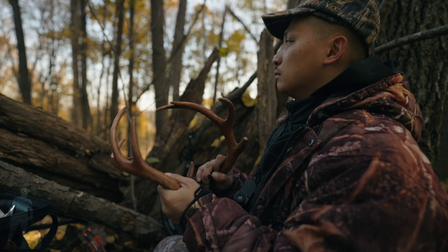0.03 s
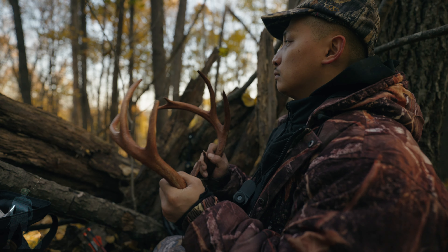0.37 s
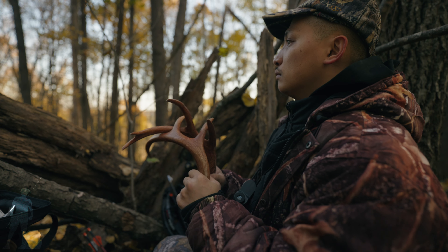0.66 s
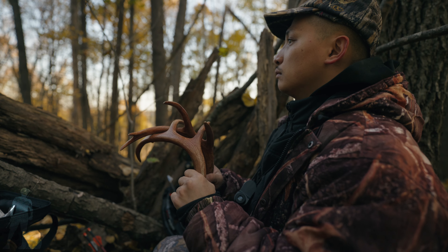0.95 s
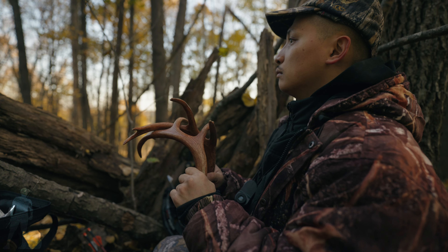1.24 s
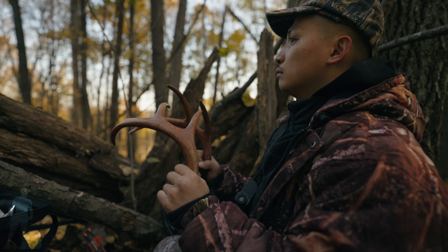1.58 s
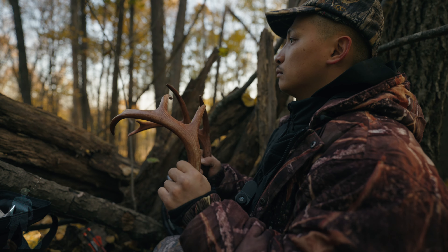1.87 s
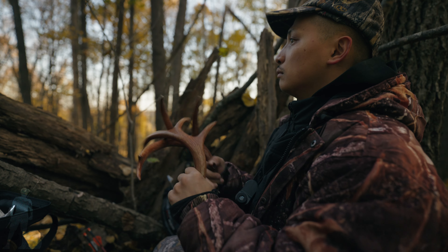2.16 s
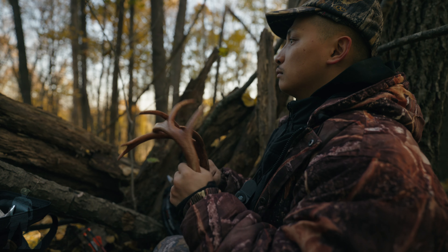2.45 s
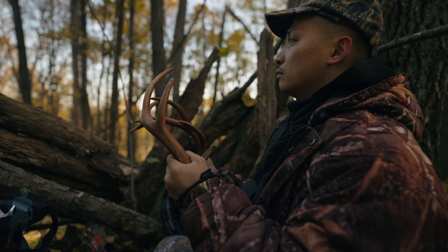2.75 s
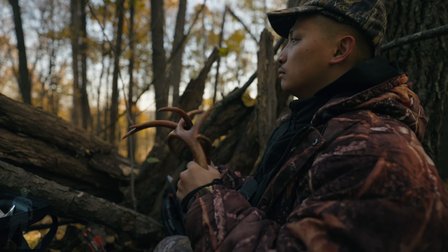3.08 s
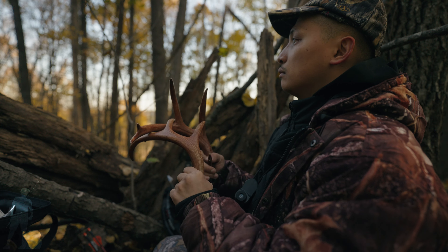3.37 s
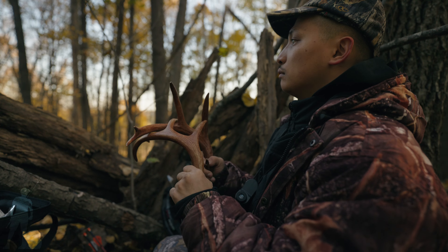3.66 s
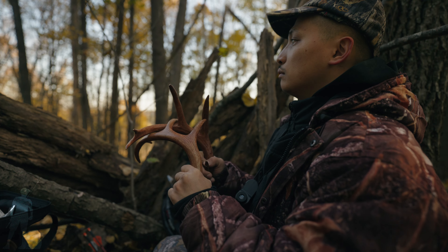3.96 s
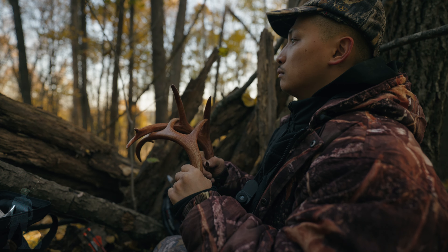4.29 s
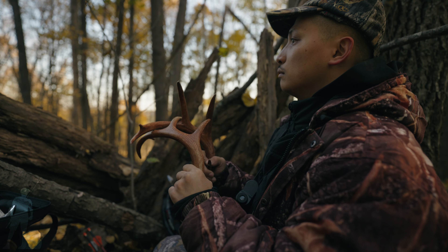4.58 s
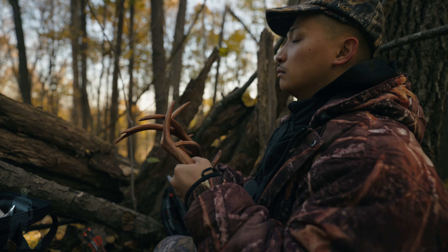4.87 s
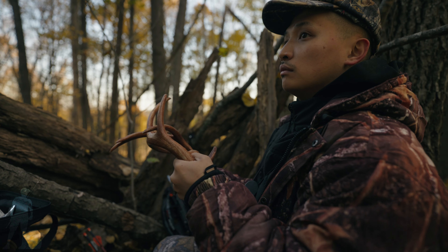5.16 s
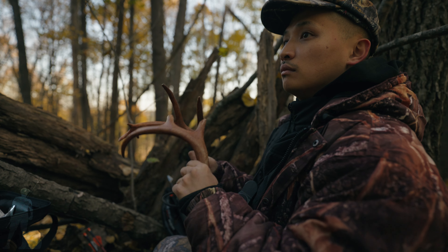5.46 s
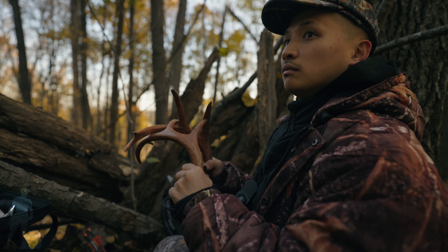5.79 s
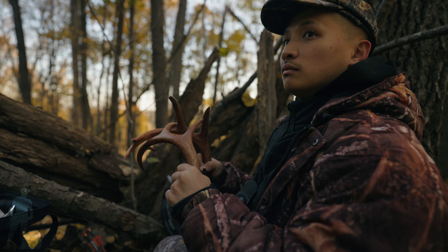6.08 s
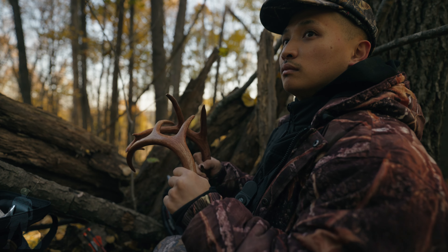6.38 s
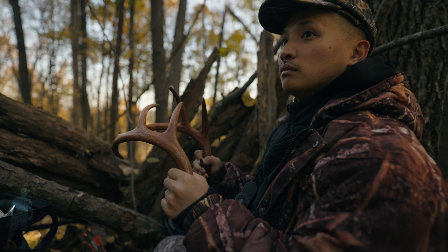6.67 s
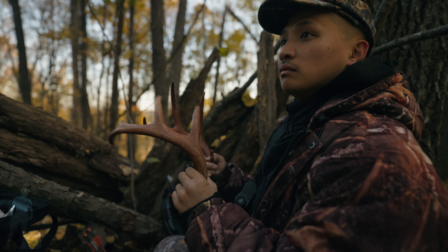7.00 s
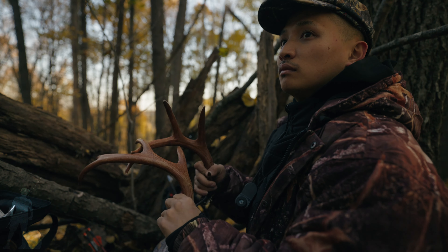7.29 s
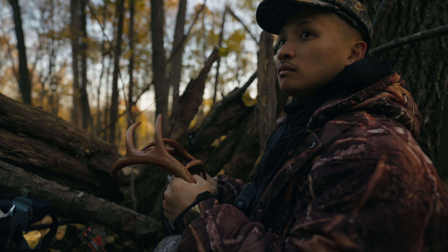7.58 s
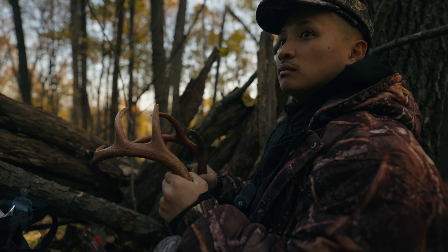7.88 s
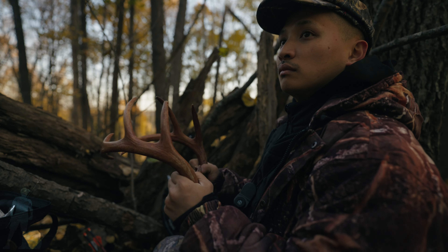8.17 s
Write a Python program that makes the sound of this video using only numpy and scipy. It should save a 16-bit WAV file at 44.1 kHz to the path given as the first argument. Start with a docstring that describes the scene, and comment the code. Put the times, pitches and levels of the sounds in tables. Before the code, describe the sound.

In quiet woods, antlers are rattled in uneven bursts of sharp clacks and scrapes, with soft sleeve swishes and low hum.

```python
"""Still woods: a hunter rattles two deer antlers in short, irregular bouts.
The tines clack, chatter and scrape, ringing the racks; in the roughest clashes the thick beams bump.
Jacket sleeves swish, a short, bright wash of hiss trails the hardest clash, and the trees echo faintly.
Underneath lies a bed of low hum, thin whine and soft air. A limiter ducks the hardest hits."""
import sys
import numpy as np
from scipy import signal
from scipy.fft import rfft, irfft, next_fast_len
from scipy.io import wavfile
from scipy.ndimage import uniform_filter1d, minimum_filter1d, map_coordinates

SR = 44100
rng = np.random.default_rng(int(sys.argv[2]) if len(sys.argv) > 2 else 0)


def digitize_waveform(pressure):
    """Quantize a signal to 16-bit integers and store it at the path in sys.argv[1].

    Rows of a 2-D input are taken as channels; values are limited to [-1, 1].
    """
    field = np.atleast_2d(pressure).T
    bounded = np.clip(field, -1, 1)
    quanta = np.round(bounded * 32767).astype(np.int16)
    wavfile.write(sys.argv[1], SR, quanta)


N = 372204

# noise colours of the bed and the swishes: (frequency [Hz], relative level [dB])
AIR_SPECTRUM = [(88, -28), (150, -2.5), (244, -3), (480, -10.5), (540, -22), (675, -12.5), (775, -24.5),
                (1020, -11), (1400, -17), (2400, -19.5), (6000, -22.5), (12000, -27.5), (15000, -30.5),
                (16000, -42)]
RUMBLE_SPECTRUM = [(20, -24), (45, -11.5), (75, -1), (100, 4), (122, 1), (150, -16.5), (250, -26),
                   (500, -74)]
SWISH_SPECTRUM = [(200, -7), (600, 9), (2500, 3), (5000, -1), (9000, -5.5), (12000, -13.5), (16000, -20.5)]
# tones of the whine: (frequency [Hz], level [dB])
WHINE_TONES = [(246, -68), (1875, -77), (1975, -66), (14070, -75)]
# swishes: (peak time [s], relative level [dB], rise [s], fall [s])
# the one at 2.305 s is a short, bright wash of hiss trailing the hardest clash; the rest are sleeves
SWISHES = [(0.03, -47, 0.46, 0.21), (0.27, -60, .15, 1), (2.14, -49.5, 0.26, 0.044),
           (2.305, -35.5, 0.036, 0.13), (3.1, -51.5, 0.16, .05), (4.69, -67, .2, .05),
           (7.05, -46.5, 0.44, 0.13), (7.22, -43, .03, .35), (8.27, -47.5, .2, .05)]
# colour of the echo off the trees: (frequency [Hz], relative level [dB])
ECHO_SPECTRUM = [(100, 0), (700, 4.5), (2500, -1), (7000, -1.5), (15000, -2.5)]
# decay of that echo: (frequency [Hz], t60 [s])
ECHO_DECAY = [(200, .4), (1500, 0.21), (5000, 0.42), (9000, .5), (14000, 0.27)]
# bending modes of the two racks: (frequency [Hz], relative level [dB], base t60 [s])
RACK_MODES = [(318, -14, 0.055), (434, -10.5, 0.062), (602, -10.5, .09), (674, -16, 0.11), (884.5, -6, .07),
              (1086, -6.5, 0.052), (1450, -7.5, 0.1), (1618, 1.5, 0.059), (1716, -6, .07), (1977, -4, .06),
              (2120, -10, 0.088), (2242, -2.5, 0.058), (2532, -1, 0.059), (2720, -8, .045),
              (2790, -1, 0.041), (3265, -2, 0.031), (3667, -2.5, 0.025), (3823, -3.5, 0.039),
              (4045, -5, .04), (4430, -8, .035), (4610, -6.5, .04), (5056, -7.5, 0.053), (5480, -9, 0.032),
              (6190, -7, 0.023), (6750, -9, 0.054), (8390, -9.5, 0.022), (9720, -12, 0.017)]
# noise colours of a beam bump, a scrape and a tine's crack: (frequency [Hz], relative level [dB])
BUMP_SPECTRUM = [(60, -25.5), (110, -11.5), (250, -0.5), (340, 1.5), (420, 1.5), (550, -14), (1200, -33.5),
                 (4000, -72)]
RASP_SPECTRUM = [(120, -29.5), (250, -16.5), (520, -15), (630, -0.5), (775, -11.5), (1050, 0), (1350, -7),
                 (1700, -3), (2500, -12.5), (3800, -14.5), (6000, -16), (9500, -22), (12000, -34.5),
                 (15000, -47)]
CRACK_SPECTRUM = [(60, -37), (160, -9.5), (330, -1.5), (770, -10), (1000, 2), (2500, 10.5), (4000, 3.5),
                  (7000, -1.5), (10000, -10), (12500, -15), (16000, -26.5)]
# decay of the crack at the usual grip: (frequency [Hz], t60 [s])
CRACK_DECAY = [(200, 0.047), (1500, 0.039), (4000, 0.045), (8000, 0.023), (15000, 0.027)]
# beam against beam: (time [s], level [dB])
BEAM_BUMPS = [(0.5268, -29), (0.5658, -24.5), (4.7124, -24), (4.7812, -21), (4.8149, -28), (4.846, -29),
              (5.57, -29.5)]
# tine sliding on tine: (start [s], length [s], relative rasp [dB], relative grit [dB], squeak [Hz])
SCRAPE_STROKES = [(0.725, 0.052, -41, -56, 2750), (1.345, 0.122, -34, -52.5, 2500),
                  (2.435, 0.07, -31, -49, 2280), (2.61, 0.07, -45, -61, 2330),
                  (2.675, 0.075, -38, -43, 3600), (3.13, 0.066, -26.5, -47, 2590),
                  (3.22, 0.08, -44.5, -54, 2700), (3.33, 0.055, -35, -48.5, 2494),
                  (4.62, 0.085, -49.5, -61, 2268), (4.91, 0.085, -44, -63, 2430),
                  (5.02, 0.075, -43.5, -57.5, 2145), (5.305, 0.128, -32.5, -47, 2132),
                  (6.1, 0.31, -43, -63, 2448), (7.38, 0.065, -37.5, -46, 2707),
                  (7.51, 0.15, -31, -45, 2620)]
# tine striking tine: (time [s], clack level [dB], beam knock [dB re clack], tip snap [dB re clack],
# tine pitch [Hz], ring length [1 = usual grip])
TINE_HITS = [(0.5155, -5.5, -15, -0.5, 1650, 0.49), (0.5233, -5, -11, -6, 1640, .9),
             (0.5275, -10, -13, -15, 1630, 1.5), (0.5607, -16.5, -31, -6, 2230, 3),
             (0.5669, -12, -26, -8, 3230, 0.94), (0.582, -8, -18, -11.5, 3230, 1.75),
             (0.611, -20.5, -9, -17.5, 2560, 2.2), (0.6247, -5, -14, -8, 2300, 0.26),
             (0.629, -6.5, -8.5, -22, 1620, 1.33), (0.6488, -14, -13, -15.5, 3220, 1.25),
             (0.6774, -29.5, -9, -19, 2860, 0.91), (1.4105, -31, -10, -24, 2570, 2.65),
             (1.471, -31, -21, -9.5, 2660, 0.88), (2.1571, -21, -7.5, 5.5, 5210, 1.03),
             (2.1965, 6, -24, -14.5, 2400, 1.6), (2.206, -4, -16.5, -13.5, 2720, 1.2),
             (2.218, 8, -18.5, -9, 2600, 0.98), (2.229, 0.5, -8.5, -15, 1630, 1.02),
             (2.2458, -7.5, -11.5, -17, 1660, 1.12), (2.4188, -24, -10, -29, 1960, 1.6),
             (2.4243, -22.5, -10.5, -30, 1640, 1.9), (2.4527, -26.5, -14, -31, 1680, 2.2),
             (2.5134, -15, -13.5, -10.5, 2250, .6), (2.5212, -21, -14.5, -5.5, 2800, 2.2),
             (2.562, -12.5, -22, -10.5, 1800, 0.95), (2.5828, -14.5, -19.5, -15.5, 1740, 1.35),
             (2.6, -25.5, -9, -15.5, 1630, .65), (2.613, -30.5, -9, -13, 1480, 1.4),
             (2.7777, -38, -16, -10.5, 3930, 1.9), (3.105, -.5, -9, -5, 3270, 1.7),
             (3.1089, 0.5, -10, -6.5, 2320, .4), (3.1145, -2, -10.5, -11.5, 2230, 1.4),
             (3.1251, 1, -6, -16, 1740, 0.59), (3.1347, -8.5, -12, -12, 2630, 1),
             (3.1471, -16, -19, -14, 2540, 1.4), (3.3622, -33.5, -21, -14, 2560, 1.53),
             (4.7125, -12, -15.5, -24, 2860, 0.97), (4.7514, 1.5, -12, -6, 1530, 0.69),
             (4.7582, -4, -13.5, 2.5, 3700, 0.93), (4.7724, -7, -6, -0.5, 5400, 1.1),
             (4.7818, -10, -36, 5, 3590, 0.56), (4.795, -22, -9, 6.5, 5600, 1),
             (4.7992, -6, -9, -2, 2880, 1.3), (4.8131, -12, -11, -18, 2570, 1.6),
             (4.8324, -15, -7.5, 10, 4390, 0.68), (4.8455, -16.5, -19, -23.5, 1460, 1.1),
             (4.8564, -21.5, -3, 2.5, 2520, 0.82), (4.8731, -29, -7.5, -0.5, 5400, 1.56),
             (5.0952, -40.5, -5.5, -21, 2000, 0.6), (5.1577, -26, -19.5, -9.5, 2640, 0.84),
             (5.1795, -35, -6.5, -23, 1450, 0.8), (5.24, -13.5, -13, -22.5, 1637, 1.1),
             (5.277, -27, -4, -22, 1670, 2), (5.4556, -13, -20, 2.5, 3700, 0.82),
             (5.4784, -20.5, -16, -3, 2460, 1.4), (5.4956, -17.5, -18, -0.5, 1790, 1.4),
             (5.5156, -14, -18, -4, 2020, 1.3), (5.5328, -12.5, -17, -21, 2490, 0.53),
             (5.5402, -17, -33, -20, 2440, 0.68), (5.5466, -13.5, -16, -12.5, 2540, 1.07),
             (5.57, -17, -15, -15, 2240, 0.94), (5.578, -19.5, -10, -16.5, 1750, 0.71),
             (6.4592, -43, -15, -5.5, 3560, 1.2), (7.0713, -17, -10, -2.5, 3420, 0.77),
             (7.0795, -2, -12.5, -7.5, 3270, 1.18), (7.093, -13, -19.5, 1.5, 1980, 1.8),
             (7.1278, -3, -8.5, -8.5, 3670, 0.83), (7.1405, -4.5, -28, -6, 3670, 0.78),
             (7.1792, -28.5, -8.5, -25, 2560, 0.64), (7.4497, -12, -14, -3.5, 4600, 1.06),
             (7.461, -23.5, -13, -8, 2540, 1.7), (7.495, -27.5, -12, -15, 2350, 0.71),
             (7.5114, -14.5, -20.5, -21, 2620, 1.4), (7.589, -23.5, -24, -18, 2430, 1.3),
             (7.6097, -31.5, -5, -10, 2800, 0.64), (7.634, -23.5, -6.5, -16, 2840, 1.9),
             (7.656, -24, -6, -5, 2660, 1.02), (7.6972, -26, -7, -2, 2800, 0.92),
             (7.715, -34, -8.5, -9, 3590, 2.2), (8.2908, -20.5, -10, 4, 3790, 1.06),
             (8.3095, -12.5, -8, -13, 1680, .57), (8.3195, -6, -18, -10.5, 2310, 1.1),
             (8.332, -7.5, -17.5, -11.5, 3960, 1.12), (8.4267, -12, -20, -11, 3830, 1.24)]
# thud, knock, clack and snap ranges of a hit: (low edge [Hz], high edge [Hz])
HIT_BANDS = [(150, 500), (500, 1200), (1200, 4500), (4500, 16000)]
BAND_FILTERS = [signal.butter(3, edges, "band", fs=SR, output="sos") for edges in HIT_BANDS]


def amp(db):
    """Decibels to gain."""
    return 10 ** (np.asarray(db) / 20)


def unit(x):
    """x scaled to rms 1."""
    return x / np.sqrt(np.mean(x ** 2) + 1e-20)


def along(points, hz):
    """A curve through (Hz, value) points, read on a log frequency axis."""
    freqs, values = np.transpose(points)
    return np.interp(np.log(hz + 1), np.log(freqs + 1), values)


def wobble(rate):
    """A smooth random curve, rate knots a second."""
    knots = rng.standard_normal(int(N * rate / SR) + 4)
    return map_coordinates(knots, [np.arange(N) * rate / SR])


def filtered(x, response):
    """Zero-phase EQ; response gives the gain at each frequency."""
    size = next_fast_len(len(x) + 8192)
    return irfft(rfft(x, size) * response(np.fft.rfftfreq(size, 1 / SR)), size)[:len(x)]


def causal_eq(x, points):
    """Minimum-phase EQ through (Hz, dB) points, which keeps attacks sharp."""
    cepstrum = irfft(np.log(amp(along(points, np.fft.rfftfreq(len(x), 1 / SR)))))
    cepstrum[1:len(x) // 2] *= 2
    cepstrum[len(x) // 2 + 1:] = 0
    return irfft(rfft(x) * np.exp(rfft(cepstrum)))


def noise(spectrum):
    """Steady coloured noise of rms 1."""
    return unit(filtered(rng.standard_normal(N), lambda hz: amp(along(spectrum, hz))))


def noise_burst(spectrum, decay, size):
    """Coloured noise in which each frequency dies at its own speed."""
    hz, t, frames = signal.stft(rng.standard_normal(size), SR, nperseg=128)
    gain = unit(amp(along(spectrum, hz)))[:, None] * amp(-60 * t / along(decay, hz)[:, None])
    return signal.istft(frames * gain, SR, nperseg=128)[1][:size]


def background(hum_hz=61.3):
    """The bed: a wavering low hum with rumble, a thin whine and the soft hiss of the air."""
    tone = lambda hz: np.sqrt(2) * np.sin(2 * np.pi * np.cumsum(hz) / SR)
    hum = amp(-40 + .5 * wobble(9.9)) * tone(hum_hz + .84 * wobble(16))
    whine = sum(amp(db + 1.5 * wobble(11)) * tone(hz + 3 * wobble(25)) for hz, db in WHINE_TONES)
    return hum + whine + amp(-54) * noise(RUMBLE_SPECTRUM) + amp(-60) * noise(AIR_SPECTRUM)


def swishes(swell_db=20):
    """Sleeves, and the hiss after the hardest clash: noise moves by swell_db over each rise and fall."""
    t = np.arange(N) / SR
    envelope = sum(amp(db - swell_db * np.maximum((peak - t) / rise, (t - peak) / fall))
                   for peak, db, rise, fall in SWISHES)
    return amp(-7) * envelope * noise(SWISH_SPECTRUM) * amp(.5 * wobble(40))


def tree_echo(x, bloom_s=.01):
    """Trunks and leaves scatter the sound into a tail that blooms a little late."""
    tail = noise_burst(ECHO_SPECTRUM, ECHO_DECAY, size=32768)
    tail *= 1 - np.exp(-np.arange(len(tail)) / SR / bloom_s)
    return signal.fftconvolve(x, tail / np.linalg.norm(tail))[:N]


def beam_bumps(size=4096, t60_s=.054):
    """A soft, heavy contact of the beams gives a short, dull thud."""
    out, t = np.zeros(N + size), np.arange(size) / SR
    for start, db in BEAM_BUMPS:
        thud = causal_eq(rng.standard_normal(size) * amp(-60 * t / t60_s), BUMP_SPECTRUM)
        attack_rms = np.sqrt(np.mean(thud[t < .006] ** 2))
        out[round(start * SR):][:size] += amp(db) * thud / attack_rms
    return out[:N]


def rack_ring(size, tine_hz, ring_length, tine_db, scatter_db, detune):
    """The racks ring: modes near the tine's pitch are boosted, and the grip damps and shifts them all."""
    hz, db, t60 = np.transpose(RACK_MODES)[:, :, None]
    t60 = np.minimum(t60, 230 / hz)  # bone is lossy: a few hundred cycles at most
    t60 = t60 * max(ring_length, .2)
    strength, shift, polarity = rng.standard_normal((3, len(RACK_MODES), 1))
    near_tine = np.exp(-(np.log2(hz / tine_hz) / .092) ** 2)
    gain = np.sign(polarity) * amp(db + tine_db * near_tine + scatter_db * strength)
    t = np.arange(size) / SR
    modes = amp(-60 * t / t60) * np.sin(2 * np.pi * hz * (1 + detune * shift) * t)
    return gain[:, 0] @ modes


def scrape_envelopes(press_db=15.5, press_share=.63, lift_db_per_s=597, pitch_rise=.16):
    """Rasp gain, grit gain and squeak pitch: a stroke presses in, holds, then dies as the tines part."""
    t = np.arange(N) / SR
    rasp, grit = np.zeros((2, N))
    pitch = np.full(N, float(SCRAPE_STROKES[0][-1]))
    for start, length, rasp_db, grit_db, hz in SCRAPE_STROKES:
        on = (t >= start) & (t < start + length + .1)
        age = t[on] - start
        swell_db = -press_db * np.maximum(1 - age / (press_share * length), 0)
        lift_db = -lift_db_per_s * np.maximum(age - length, 0)
        rasp[on] += amp(rasp_db + swell_db + lift_db)
        grit[on] += amp(grit_db + swell_db + lift_db)
        pitch[on] = hz * (1 + pitch_rise * (np.minimum(age / length, 1) - .5))
    return rasp, grit, pitch


def tine_scrapes(slips_per_s=1100, ring_db=1.5, squeak_db=-3, crossover_hz=4500):
    """Sliding tines catch on their ridges: a dense stream of slips rasps, rings the racks and squeaks."""
    slips = (rng.random(N) < slips_per_s / SR) * rng.standard_normal(N)
    grip = amp(3.4 * wobble(110))
    friction = unit((unit(slips) + .5 * rng.standard_normal(N)) * grip)
    rasp = unit(filtered(friction, lambda hz: amp(along(RASP_SPECTRUM, hz))))
    rack = rack_ring(size=4096, tine_hz=2493, ring_length=1, tine_db=5.5, scatter_db=-5, detune=.002)
    ring = unit(signal.fftconvolve(friction, rack)[:N])
    rasp_gain, grit_gain, pitch_hz = scrape_envelopes()
    phase = 2 * np.pi * np.cumsum(pitch_hz * np.exp(.09 * wobble(60))) / SR
    squeak = unit(grip * (wobble(250) * np.sin(phase) + wobble(250) * np.cos(phase)))
    rub = rasp + amp(ring_db) * ring + amp(squeak_db) * squeak
    body = filtered(rub, lambda hz: 1 / (1 + (hz / crossover_hz) ** 8))
    grit = rub - body
    return amp(-2.5) * (rasp_gain * unit(body) + grit_gain * unit(grit))


def chatter(size, bounces=6, mean_delay_s=.006, bounce_db=-15):
    """One blow, then tiny bounces as the knobbly tines skid on."""
    force = np.zeros(size)
    delays = np.minimum(rng.exponential(mean_delay_s, bounces), size / SR / 2)
    fade = np.exp(-delays / mean_delay_s / 2)
    force[(delays * SR).astype(int)] = amp(bounce_db) * rng.standard_normal(bounces) * fade
    force[0] = 1
    return force


def strike_tone(hit, clack_db, knock_db, snap_db):
    """Where a blow lands sets its tone: tips snap brightly, thick beams knock and thud."""
    attack = hit[:round(.006 * SR)]
    attack_db = [10 * np.log10(np.mean(signal.sosfilt(band, attack) ** 2)) for band in BAND_FILTERS]
    thud_db = -19.5 + .44 * knock_db  # more knock brings more low end
    thud, knock, clack, snap = clack_db + np.array([thud_db, knock_db, 0, snap_db]) - attack_db
    return causal_eq(hit, [(110, thud - 8), (260, thud + 2.1), (420, thud + .27),
                           (600, knock + .067), (1050, knock + .7),
                           (1450, clack - .3), (3600, clack + .28),
                           (5800, snap + .43), (10000, snap + 1.9), (15000, snap - 6)])


def tine_clacks(size=6144):
    """Tine strikes tine: a tick and a crack at the point of contact, over the ring of the racks."""
    out, t = np.zeros(N + size), np.arange(size) / SR
    for start, clack_db, knock_db, snap_db, tine_hz, ring_length in TINE_HITS:
        tick = amp(14 - 60 * t / .0075) * unit(causal_eq(rng.standard_normal(size), CRACK_SPECTRUM))
        decay = [(hz, t60 * max(ring_length, .2)) for hz, t60 in CRACK_DECAY]
        crack = amp(6.5) * noise_burst(CRACK_SPECTRUM, decay, size)
        ring = rack_ring(size, tine_hz, ring_length, tine_db=13.5, scatter_db=2, detune=.013)
        hit = (tick + crack + ring) * (1 - np.exp(-t / .0003))  # the tines take a moment to press home
        hit = signal.fftconvolve(hit, chatter(size))[:size]
        out[round(start * SR):][:size] += strike_tone(hit, clack_db, knock_db, snap_db)
    return out[:N]


def scene():
    """The mono mix: antlers up front, their echo, the swishes and the bed behind."""
    antlers = tine_clacks() + beam_bumps() + tine_scrapes()
    return (antlers + amp(-28) * tree_echo(antlers) + swishes() + background())[None]


def release(cut_db, db_per_s):
    """A gain cut that lets go at a steady rate."""
    ramp = db_per_s * np.arange(N) / SR
    return np.maximum.accumulate(cut_db + ramp) - ramp


def record(dry, threshold=1.1, window=129, top_hz=16100):
    """A look-ahead limiter with a quick and a slow release, then a soft clip and a steep high cut."""
    over_db = np.maximum(20 * np.log10(np.abs(dry[0]) / threshold + 1e-9), 0)
    needed_db = -minimum_filter1d(-over_db, size=window)
    quick_db = release(needed_db, db_per_s=121)
    sustained_db = signal.lfilter([1 / 600], [1, 1 / 600 - 1], quick_db)
    slow_db = release(.36 * sustained_db, db_per_s=3)
    limited = dry[0] * amp(-uniform_filter1d(np.maximum(quick_db, slow_db), size=window))
    rounded = limited / (1 + np.abs(limited) ** 8) ** (1 / 8)
    return filtered(rounded, lambda hz: 1 / (1 + (hz / top_hz) ** 120))[None]


dry = scene()
out = record(dry)
digitize_waveform(out)
```